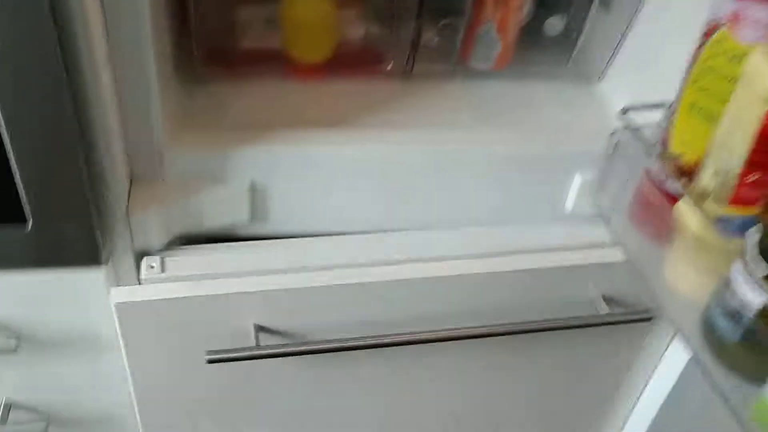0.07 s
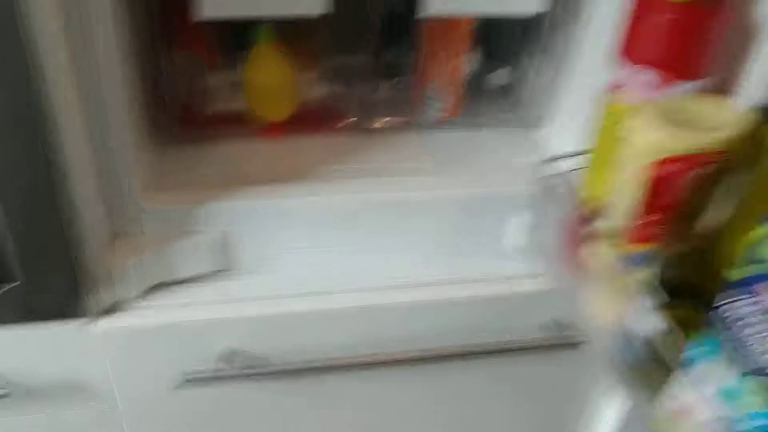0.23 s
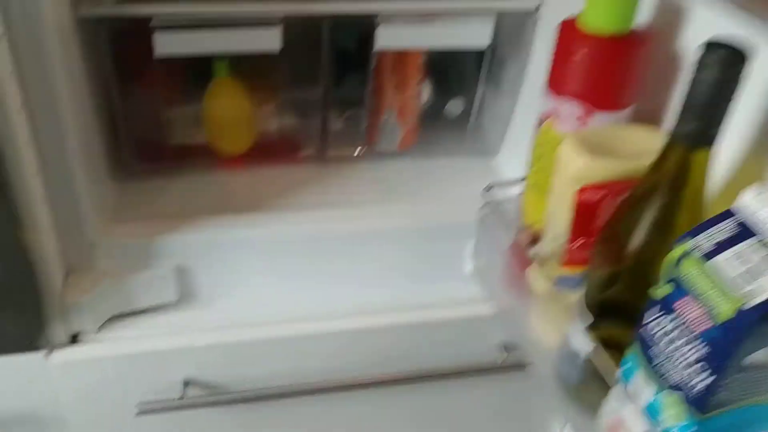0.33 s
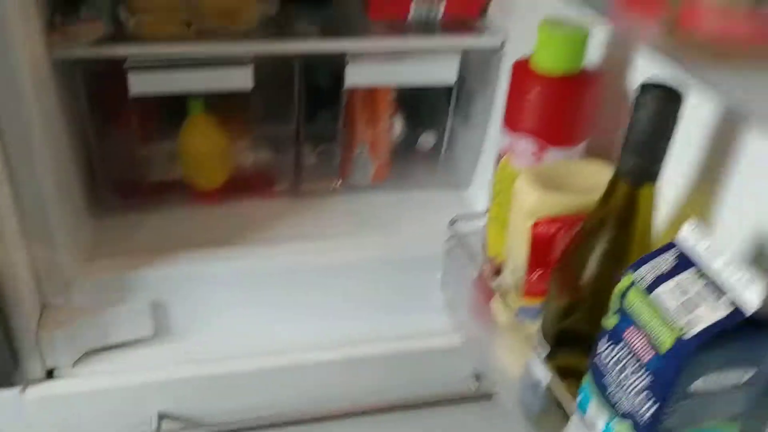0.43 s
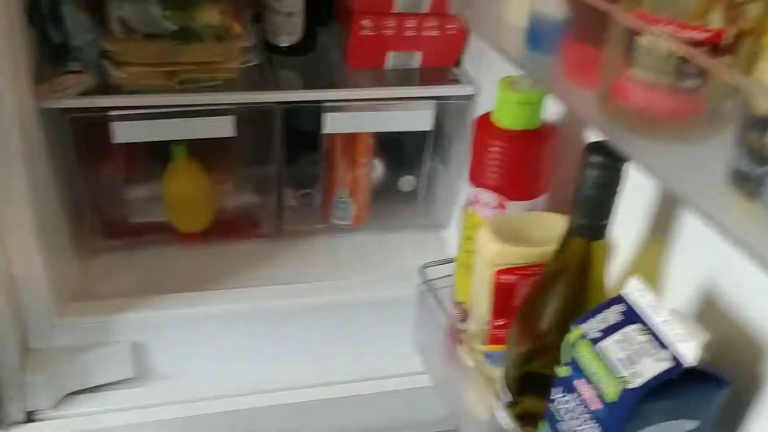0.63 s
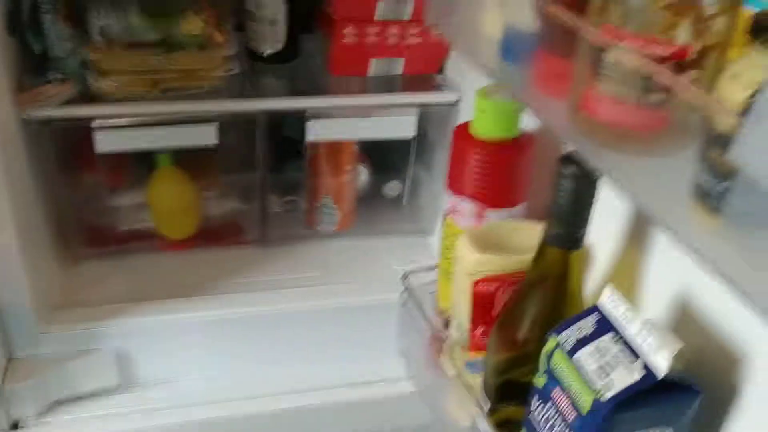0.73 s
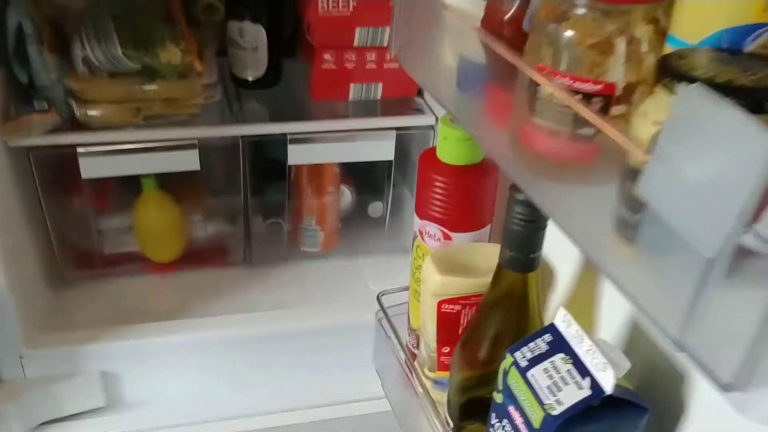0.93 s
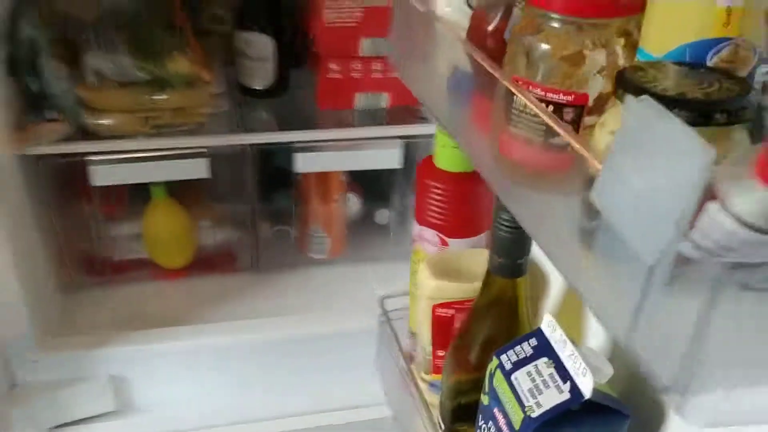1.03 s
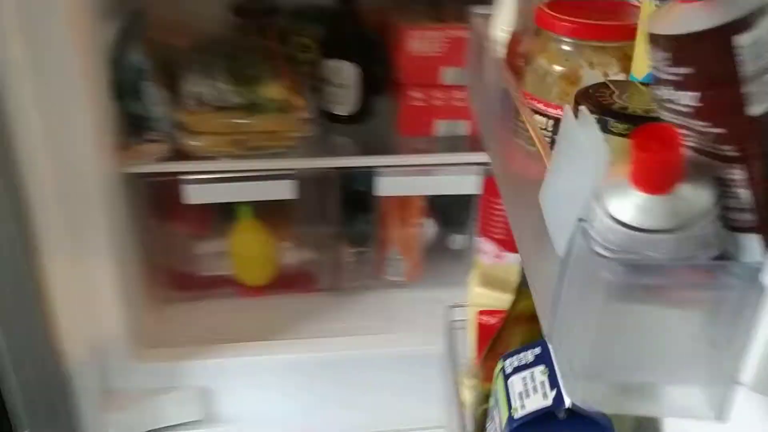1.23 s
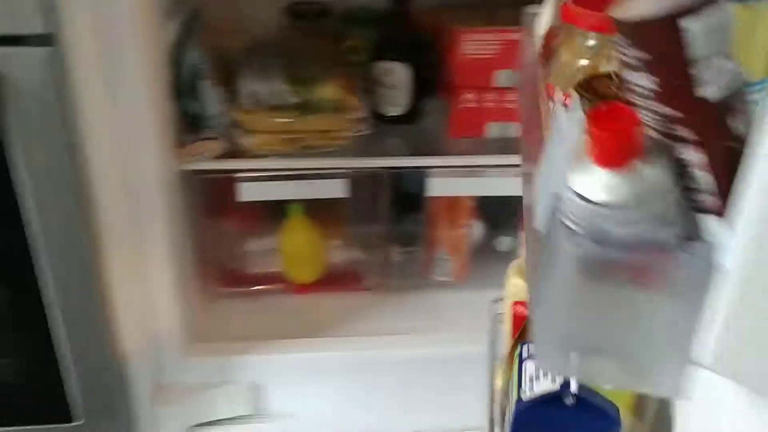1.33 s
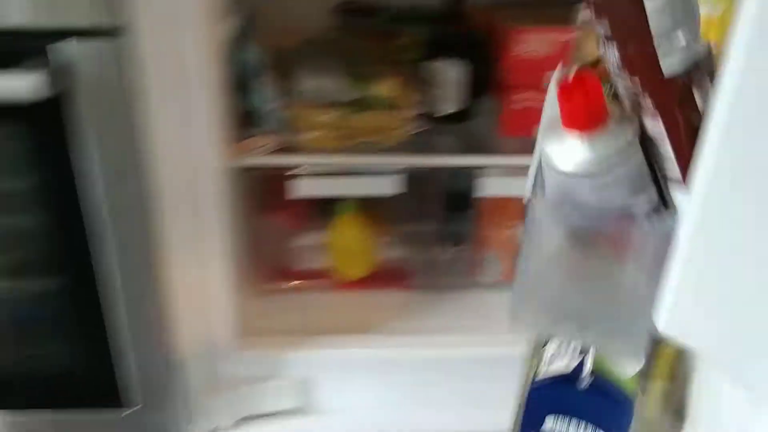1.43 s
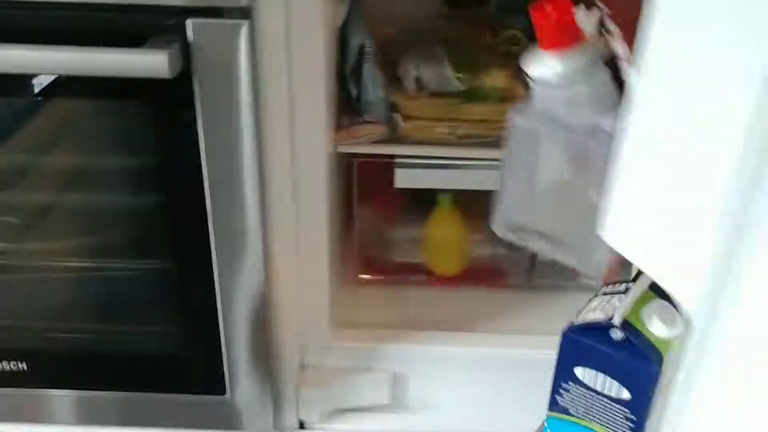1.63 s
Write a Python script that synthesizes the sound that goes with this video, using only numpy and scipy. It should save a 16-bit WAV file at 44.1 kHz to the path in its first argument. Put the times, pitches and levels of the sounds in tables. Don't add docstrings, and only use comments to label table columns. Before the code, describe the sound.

A freezer door slams with a hard, quick thud and short panel ring; bottles and shelves knock lightly, then a second door peels open and rumbles softly, in a quiet humming kitchen, close phone microphone.

```python
import sys
import numpy as np
from scipy import signal
from scipy.fft import rfft, irfft
from scipy.io import wavfile
from scipy.ndimage import uniform_filter1d

SR = 44100
rng = np.random.default_rng(int(sys.argv[2]) if len(sys.argv) > 2 else 0)


def wav_out(sig):
    wavfile.write(sys.argv[1], SR, np.round(np.clip(np.atleast_2d(sig).T, -1, 1) * 32767).astype(np.int16))


def rack_gain(trim_db):
    fader = np.asarray(trim_db, float)
    return 10 ** (fader / 20)


N = 74970
T = np.arange(N) / SR
HZ = np.fft.rfftfreq(N, 1 / SR)


def evened(x):
    return x / np.sqrt(np.mean(x ** 2) + 1e-20)


def read(points, hz):
    f, value = np.transpose(points)
    return np.interp(np.log(hz + 1), np.log(f + 1), value)


def curve(rows):
    times, levels = np.transpose(rows)
    return np.interp(T, times, levels)


def colour(x, gain):
    return irfft(rfft(x) * gain, N)


def peaks(table):
    power = sum(rack_gain(db) ** 2 / (1 + (2 * (HZ - f) / width) ** 2) for f, width, db in table)
    return np.sqrt(power)


def noise_pair():
    return rng.standard_normal((2, N))


def diffuse(a, b):
    spacing_s = 0.00033
    same = np.sinc(2 * HZ * spacing_s) * (1 - 0.69 * HZ / (HZ + 1500))
    other = np.sqrt(1 - same ** 2)
    return np.array([a, colour(a, same) + colour(b, other)])


def wobble(size):
    return evened(uniform_filter1d(uniform_filter1d(rng.standard_normal(N), size), size))


def patchy(x, patchy_db):
    z = signal.stft(x, nperseg=512)[2]
    field = uniform_filter1d(rng.standard_normal(z.shape[1:]), size=14, axis=1)
    field = evened(uniform_filter1d(field, size=5, axis=0))
    return evened(signal.istft(z * rack_gain(patchy_db * field), nperseg=512)[1][:, :N])


def burst(s, t60, rise=0.00086):
    since = np.maximum(T - s, 0)
    return (1 - np.exp(-since / rise)) * rack_gain(-60 * since / max(t60, .005))


def ring(s, hz, t60):
    return burst(s, t60) * np.sin(2 * np.pi * hz * (T - s))


def placed(x, room_db, loose=.5):
    # (pitch [Hz], time to fall by 60 dB [s])
    kitchen = [(100, 0.7), (500, 0.68), (2000, 0.36), (10000, 0.91)]
    lead_s, right_near_db = 0.00012, 1.5
    hz, t, z = signal.stft(noise_pair(), SR, nperseg=256)
    fading = z * rack_gain(-60 * t / read(kitchen, hz)[:, None])
    tail = signal.istft(fading, SR, nperseg=256)[1][:, :N] * (T > .008)
    tail = diffuse(*tail) / np.linalg.norm(tail[0])
    near = rng.choice([-1., 1.], (2, N)) * (rng.random((2, N)) < .1)
    near = near * rack_gain(-60 * T / 0.032) * (T > .0008)
    near = colour(near * loose / np.linalg.norm(near[0]), HZ ** 2 / (HZ ** 2 + 900 ** 2))[:, :N // 2]
    late = colour(x, np.exp(-2j * np.pi * HZ * lead_s))
    direct = np.array([x, late * rack_gain(right_near_db * loose)])
    echoes = signal.fftconvolve(x[None], near, axes=1)[:, :N]
    reverb = signal.fftconvolve(x[None], tail, axes=1)[:, :N]
    return direct + echoes + rack_gain(room_db) * reverb


def slam():
    # (time [s], level [dB])
    blows = [
        (0.2336, -3),
        (0.2350, 4),
        (0.2361, 0),
        (0.2378, 1),
        (0.2399, 2),
        (.2445, -6),
        (0.2525, -6),
    ]
    # (pitch [Hz], level [dB], time to fall by 60 dB [s])
    panel_modes = [(82, -9.5, 0.23), (134.7, -13, 0.34), (410.3, -12, 0.17), (663.3, -20.5, 0.25),
                   (770, -10, 0.086), (888, -6, 0.085), (960, -2, 0.081), (1063, -8.5, 0.074),
                   (1122, -11, 0.066), (1364, -12, 0.12), (1596, -3.5, 0.084), (1857, -12, 0.064),
                   (1970, -9.5, 0.094)]
    # (pitch [Hz], level [dB per Hz])
    crack_tone = [(60, -44), (150, -15.5), (550, -15), (1050, -8.5), (1800, -13.5), (2600, -20),
                  (4000, -15.5), (9000, -15), (13000, -16), (16800, -38)]
    crack_t60, crack_db, snap_db, panel_db = 0.12, -24.5, -16, -34
    touch = blows[0][0]

    loudness = rack_gain(-10) * burst(touch, crack_t60)
    for s, db in blows[1:]:
        loudness += rack_gain(db) * (burst(s, crack_t60) + 2.5 * burst(s, .005, rise=.00005))
    crack = colour(loudness * diffuse(*noise_pair()), rack_gain(read(crack_tone, HZ)))
    main_part = crack[:, round(.235 * SR):round(.25 * SR)]
    crack *= rack_gain(crack_db) / np.sqrt(np.mean(main_part ** 2))

    snap = sum(rack_gain(snap_db + 2 * db) * np.exp(-((T - s) * 40000) ** 2) for s, db in blows[1:])
    snap = colour(snap, HZ ** 2 / (HZ ** 2 + 5000 ** 2))
    push = rack_gain(-18) * burst(touch, .008, rise=.0002) * np.sin(2 * np.pi * 750 * (T - touch))
    panel = sum(rack_gain(db + blow_db) * ring(s, f, t60)
                for f, db, t60 in panel_modes for s, blow_db in blows[:2])

    shudder_hz, shudder_width_hz, shudder_db = 207, 57, -45.5
    shake = evened(colour(rng.standard_normal(N), peaks([(shudder_hz, shudder_width_hz, 0)]) ** 2))
    shake = shake + 0.39 * np.sin(2 * np.pi * shudder_hz * T)
    swell = np.exp(-((T - 0.316) / 0.079) ** 2)
    shudder = rack_gain(shudder_db) * swell * shake
    near_hit = 0.33 * crack[0] + snap + push + rack_gain(panel_db) * panel
    return crack + placed(near_hit, -2.5, loose=0.7) + shudder


def knocks():
    # (time [s], peak level [dB], pitch [Hz], spread [octaves], time to fall by 60 dB [s])
    bumps = [(0.025, -45, 1321, 0.74, 0.4), (0.1252, -35.5, 1200, 1.33, 0.057),
             (.1447, -28, 2380, 1.2, 0.019), (0.151, -37, 1310, 0.22, 0.078),
             (0.153, -36.5, 182, 0.43, 0.19), (.1565, -50, 2020, 0.95, 0.017),
             (.1878, -33, 970, 0.89, 0.022), (.2, -44, 684, 0.48, 0.13), (1.12, -58.5, 2900, 0.42, 0.4),
             (.2835, -28, 590, 0.58, 0.033), (.304, -33.5, 930, 1.2, 0.052), (0.316, -39, 950, 0.18, 0.045),
             (0.355, -36, 2450, 0.64, 0.036), (0.916, -50.5, 3560, 1.05, 0.1),
             (0.971, -44.5, 4250, 1.1, 0.07), (1.23, -57.5, 3000, 0.88, .03), (0.653, -66, 365, 0.76, 0.31),
             (0.859, -61, 312.5, 0.62, 0.41), (0.906, -53.5, 1620, 1.1, 0.22),
             (.978, -43.5, 1306, 0.5, 0.071), (1.004, -35, 2220, 1.76, 0.042),
             (1.019, -35.5, 1624, 0.55, 0.041), (1.02, -41, 467, 0.88, 0.15),
             (1.058, -43, 1070, 1.2, 0.056), (1.193, -39, 1174, 0.34, 0.045), (1.108, -48, 368, 0.38, .06),
             (1.152, -40, 470, 0.28, 0.052), (1.191, -44, 490, 0.36, 0.061),
             (1.215, -45.5, 3540, 0.11, 0.1), (1.256, -42.5, 514, 0.14, 0.14),
             (1.26, -46, 2046, 0.62, 0.018), (1.292, -40.5, 1148, 0.1, 0.036),
             (1.373, -40, 3700, 0.089, 0.041), (1.451, -50.5, 1116, 0.21, 0.15),
             (1.366, -48.5, 1153, 0.25, 0.18), (1.573, -48.5, 3620, 0.081, 0.24),
             (1.576, -47.5, 492, 0.16, 0.39), (1.575, -46.5, 1183, 0.33, 0.12)]
    ring_db, noise_db = -14.5, -7
    out, noise = np.zeros(N), rfft(rng.standard_normal(N))
    for s, db, hz, spread, t60 in bumps:
        around = np.exp(-(np.log2((HZ + 1) / hz) / spread) ** 2) / np.sqrt(HZ + 1)
        puff = evened(irfft(noise * around, N)) * burst(s, t60, rise=t60 / 40)
        out += rack_gain(db) * (rack_gain(ring_db) * ring(s, hz, t60) + rack_gain(noise_db) * puff)
    return placed(out, -9.5, loose=1.0)


def ticks():
    # (time [s], peak level [dB], time to fall by 60 dB [s], low edge [Hz])
    snaps = [(0.0285, -38.5, 0.037, 2990), (0.0973, -51.5, .02, 7000), (.229, -42.5, .05, 6000),
             (0.3561, -22, 0.03, 1500), (.696, -36, 0.02, 9700), (0.734, -40, .02, 9730),
             (1.005, -48, .04, 2530), (1.011, -56, .02, 6000), (1.0194, -36.5, 0.03, 9000),
             (1.0464, -39.5, 0.04, 6050), (1.229, -47.5, .03, 3070), (1.259, -49, .03, 5020),
             (1.37, -46, .04, 5070)]
    # (pitch [Hz], level [dB per Hz])
    tick_tone = [(1500, -10), (3000, -16), (5500, -6), (9000, -1.5), (11000, -1.5), (14000, -7.5),
                 (16800, -11)]
    click_db, sharpness = 7, 1.76
    tone, out = rack_gain(read(tick_tone, HZ)) * (HZ > 1200), np.zeros(N)
    noise = evened(colour(rng.standard_normal(N), tone))
    for s, db, t60, low_hz in snaps:
        click = irfft(tone * np.exp(-2j * np.pi * HZ * (s + .0003)), N)
        click = rack_gain(click_db) * click / click.max()
        fizz = (.5 * burst(s, t60, rise=.0002) + sharpness * burst(s, .007, rise=.0001)) * noise
        out += rack_gain(db) * colour(fizz + click, 1 / (1 + (low_hz / (HZ + 1)) ** 6))
    return placed(0.32 * out, -5.5, loose=0.89)


def swing():
    # (time [s], level [dB])
    swing_level = [(0, -59), (.11, -63), (.135, -55), (.22, -51.5), (.34, -47.5), (.47, -55.5),
                   (.54, -69.5), (.62, -83.5), (1.0, -73.5), (1.03, -52), (1.1, -54.5), (1.17, -55.5),
                   (1.2, -52), (1.4, -52), (1.53, -59), (1.58, -59.5), (1.7, -56.5)]
    # (pitch [Hz], level [dB per Hz])
    swing_tone = [(110, -16), (140, -12), (500, -15), (750, -22), (1160, -12), (2700, -15), (9000, -21),
                  (12000, -46)]
    # (pitch [Hz], width [Hz], level [dB])
    door_body = [(199, 72, -4), (348, 360, -7), (494.3, 63, -2.5), (1127, 140, -4.5), (1620, 208, -12.5),
                 (2070, 138, -14.5), (3620, 210, -12.5)]
    rubs_per_s, rub_spread_db, body_db = 900, 3, 3.5
    strength = rack_gain(rub_spread_db * np.minimum(rng.exponential(1, (2, N)), 3))
    rubs = (rng.random((2, N)) < rubs_per_s / SR) * strength * rng.choice([-1., 1.], (2, N))
    rubs = rubs + 0.16 * noise_pair()
    wash = evened(colour(rubs, rack_gain(read(swing_tone, HZ)) * (HZ > 110)))
    smear = np.exp(1j * np.cumsum(0.074 * rng.standard_normal(len(HZ))))
    body = evened(colour(rubs, peaks(door_body) * (HZ > 110) * smear))
    both = patchy(diffuse(*(wash + rack_gain(body_db) * body)), 2.04)
    return both * rack_gain(curve(swing_level) + 1.15 * wobble(size=400))


def pips():
    # (time [s], peak level [dB], pitch [Hz])
    peels = [
        (0.921, -63, 8700),
        (.9280, -51, 8780),
        (0.9373, -52, 8700),
        (.966, -59.5, 9000),
        (.972, -51, 8540),
        (0.9733, -55, 8540),
        (0.978, -49, 9020),
    ]
    spread_octaves = .16
    noise, out = rfft(rng.standard_normal(N)), np.zeros(N)
    for s, db, hz in peels:
        around = np.exp(-(np.log2((HZ + 1) / hz) / spread_octaves) ** 2)
        squeak = np.sin(2 * np.pi * hz * T) + .5 * evened(irfft(noise * around, N))
        out += rack_gain(db) * burst(s, .014, rise=.0002) * squeak
    return placed(2 * out, -18, loose=0.32)


def rustle():
    # (time [s], level [dB])
    rustle_level = [(0, -78.5), (.04, -54), (.12, -62), (.22, -76), (.38, -67.5), (.46, -52), (.56, -59),
                    (.88, -78), (.93, -54), (.96, -83), (1.02, -63), (1.08, -60.5), (1.15, -85.5),
                    (1.42, -72.5), (1.52, -52.5), (1.64, -51), (1.7, -62)]
    # (pitch [Hz], level [dB per Hz])
    rustle_tone = [(1500, -11), (3000, -13), (5500, -14), (8660, -2.5), (12000, -4), (15800, -8)]
    grain = noise_pair() * rack_gain(1.8 * wobble(size=60))
    brushing = colour(diffuse(*grain), rack_gain(read(rustle_tone, HZ)) * (HZ > 900))
    return patchy(brushing, 2.5) * rack_gain(curve(rustle_level))


def air():
    # (time [s], level [dB])
    air_level = [(0, -58), (.22, -61.5), (.3, -59), (.5, -59), (.75, -57), (.87, -60.5), (1.3, -63.5),
                 (1.7, -62)]
    # (pitch [Hz], width [Hz], level [dB])
    gaps = [(1900, 500, -15), (3520, 700, -3.5), (6500, 410, -12), (9000, 900, 2), (11350, 1200, -6),
            (13660, 300, -1), (14800, 2000, -10)]
    hiss = colour(diffuse(*noise_pair()), peaks(gaps) ** 1.08 * (HZ > 1000))
    return patchy(hiss, 2.94) * rack_gain(curve(air_level))


def hum():
    # (time [s], level [dB])
    hum_level = [(0, -58), (.03, -52), (.22, -52.5), (.44, -51), (.63, -53), (.87, -54), (.89, -58.5),
                 (.92, -49), (.955, -59.5), (.98, -51.5), (1.07, -52), (1.15, -54.5), (1.18, -66),
                 (1.21, -54), (1.3, -51), (1.42, -53.5), (1.7, -56.5)]
    # (pitch [Hz], level [dB per Hz])
    kitchen_tone = [(25, -22), (67, -7.5), (126, -6), (216, -22), (1180, -41), (2500, -43)]
    hum_hz, kitchen_db = 99.15, -66.5
    tone = np.sqrt(2) * rack_gain(curve(hum_level)) * np.sin(2 * np.pi * hum_hz * T)
    low = colour(diffuse(*noise_pair()), rack_gain(read(kitchen_tone, HZ)) * (HZ < 3000))
    return tone + rack_gain(kitchen_db) * evened(low)


def scene():
    return slam() + knocks() + ticks() + swing() + pips() + rustle() + air() + hum()


def roll_off(x):
    return signal.sosfilt(signal.butter(12, 17010, fs=SR, output="sos"), x)


def record(dry):
    # (pitch [Hz], difference [dB])
    right_tilt = [(100, 0.43), (600, .5), (1290, 4), (2400, 3.5), (4400, 1), (8000, .5), (15000, 2)]
    # (pitch [Hz], width [Hz], level [dB])
    phone_body = [(7000, 380, -2.5), (10310, 450, -2.5), (5820, 71, 0.5)]
    edge_hz, low_cut_hz, limit = 15850, 42, .5
    tilt = read(right_tilt, HZ) / 2
    body_db = sum(db * np.exp(-((HZ - hz) / width) ** 2) for hz, width, db in phone_body)
    mic_db = np.array([-tilt, tilt]) + body_db - 10 * (HZ > edge_hz)
    x = colour(dry, rack_gain(mic_db) * HZ ** 3 / (HZ ** 3 + low_cut_hz ** 3))

    gate_db, gate_depth_db = -1, -9
    hz, t, z = signal.stft(x, SR, nperseg=1024)
    power = uniform_filter1d((abs(z) ** 2).mean(0), size=5, axis=1)
    level_db = 10 * np.log10(uniform_filter1d(power, size=4, axis=0) + 1e-20)
    quiet_db = uniform_filter1d(np.percentile(level_db, 15, axis=1), size=30)[:, None]
    above_db = np.clip(level_db - quiet_db - gate_db, -30, 30)
    shut = (hz[:, None] > 250) / (1 + np.exp(above_db))

    treble = z[:, (hz > 12000) & (hz < edge_hz)]
    top_db = 10 * np.log10((abs(treble) ** 2).mean((0, 1)) + 1e-20)
    hit = (top_db > np.median(top_db) + 15) & (top_db > np.roll(top_db, shift=2) + 4)
    z = z * np.where((hz[:, None] > edge_hz) & ~hit, 0, 1)
    gated = signal.istft(z * rack_gain(gate_depth_db * shut), nperseg=1024)[1][:, :N]
    return roll_off(limit * np.tanh(gated / limit))


dry = scene()
out = record(dry)
wav_out(out)
```